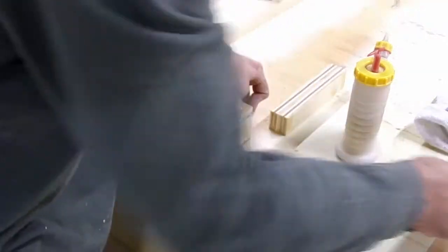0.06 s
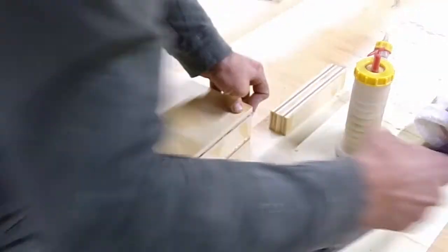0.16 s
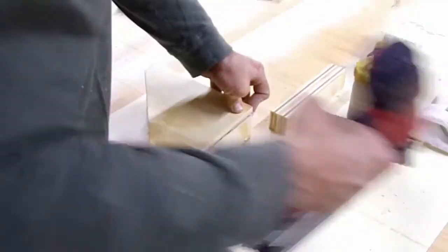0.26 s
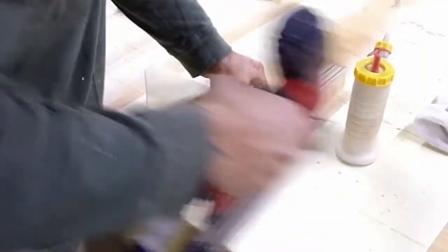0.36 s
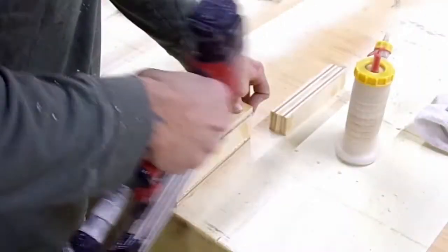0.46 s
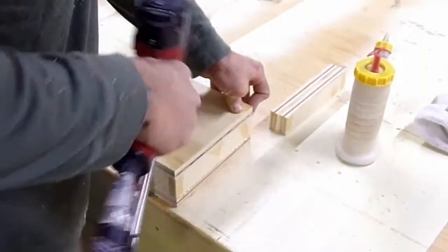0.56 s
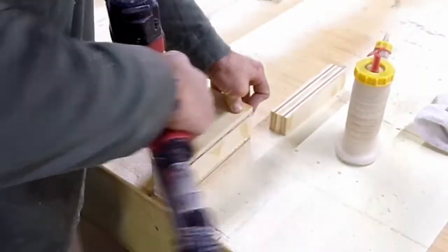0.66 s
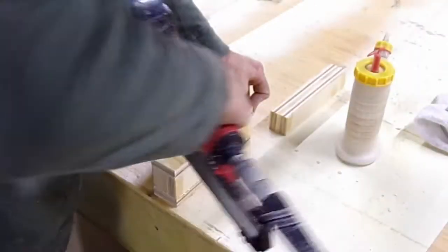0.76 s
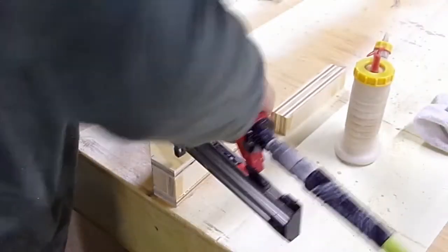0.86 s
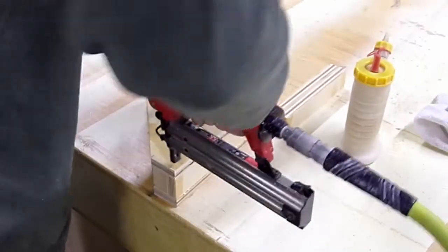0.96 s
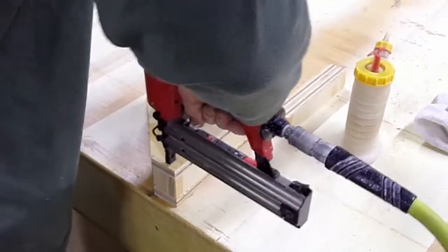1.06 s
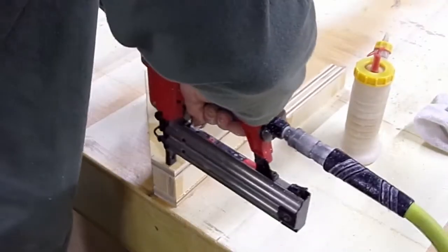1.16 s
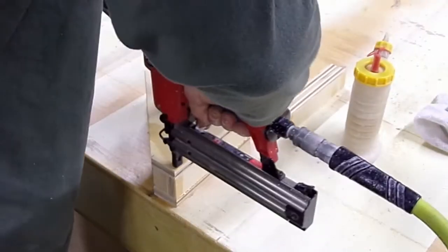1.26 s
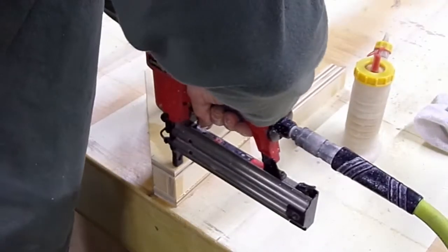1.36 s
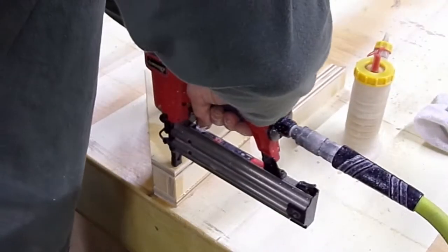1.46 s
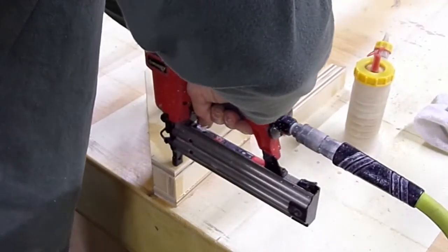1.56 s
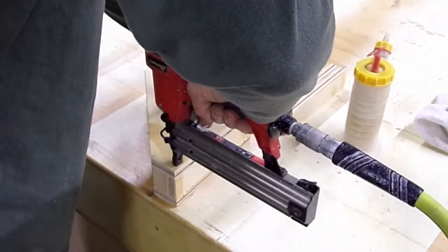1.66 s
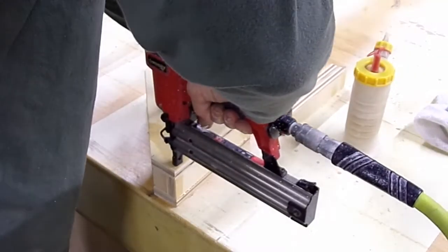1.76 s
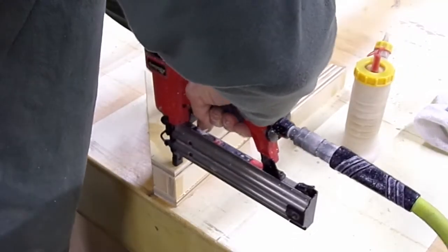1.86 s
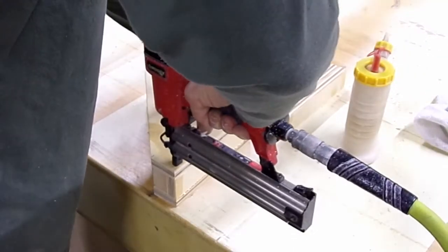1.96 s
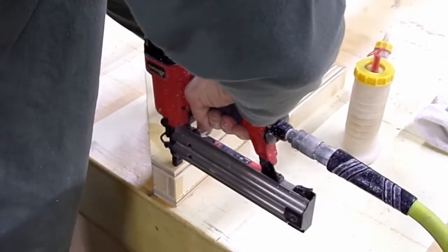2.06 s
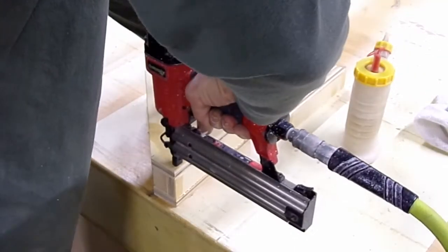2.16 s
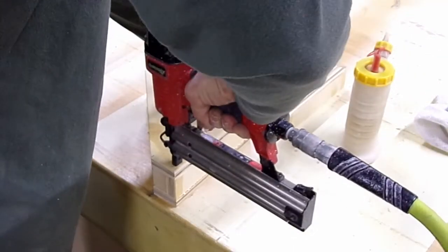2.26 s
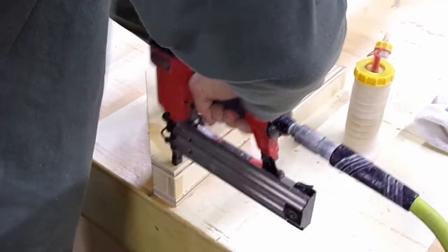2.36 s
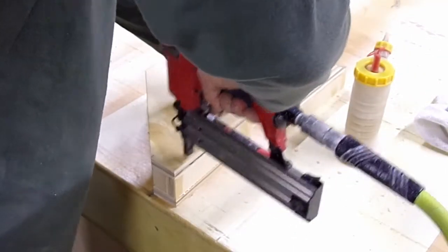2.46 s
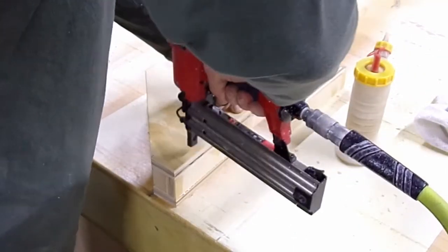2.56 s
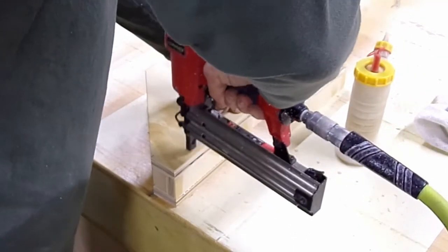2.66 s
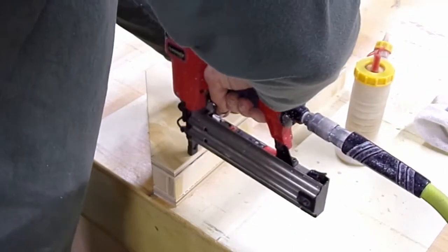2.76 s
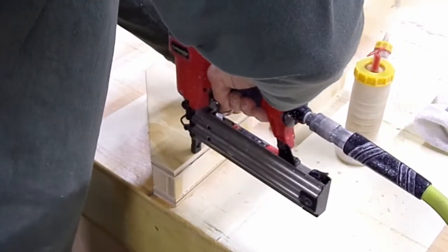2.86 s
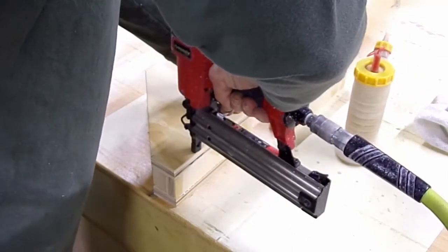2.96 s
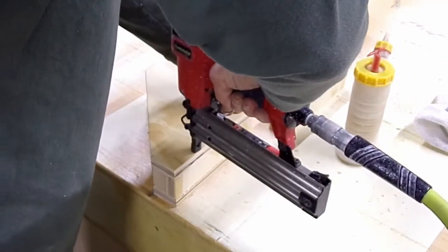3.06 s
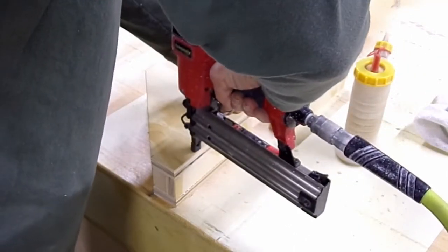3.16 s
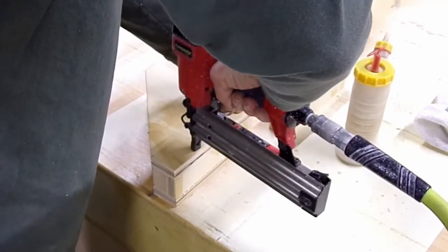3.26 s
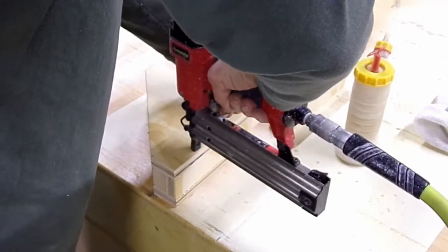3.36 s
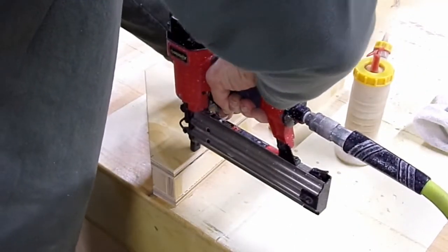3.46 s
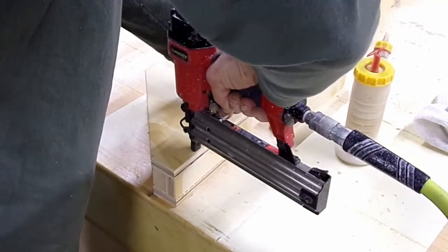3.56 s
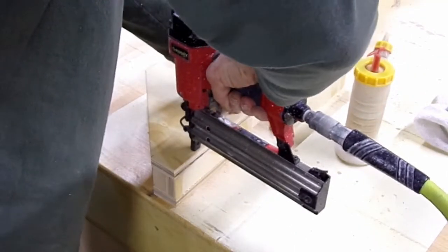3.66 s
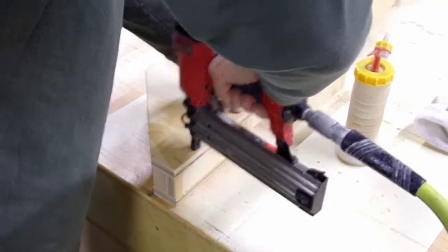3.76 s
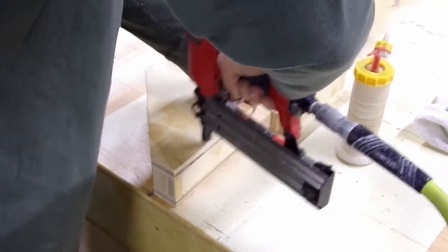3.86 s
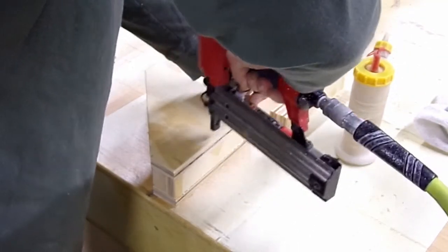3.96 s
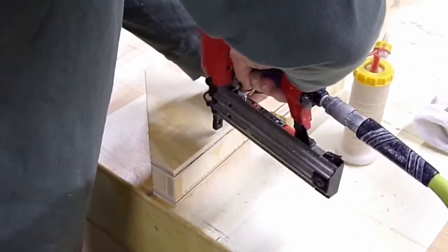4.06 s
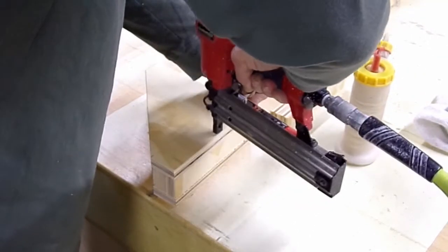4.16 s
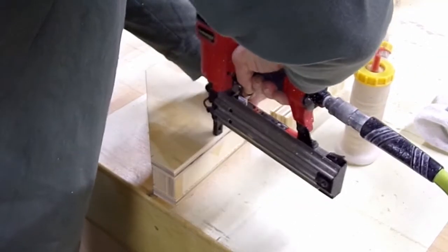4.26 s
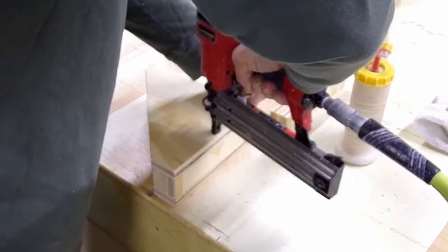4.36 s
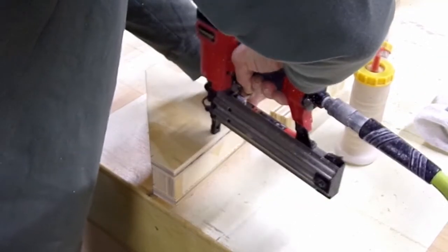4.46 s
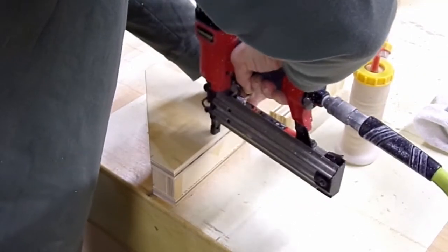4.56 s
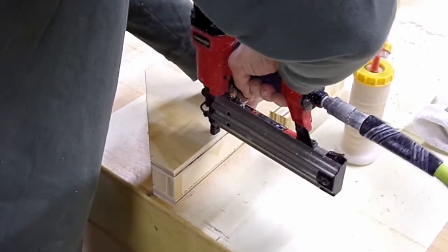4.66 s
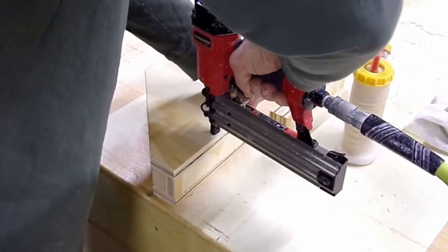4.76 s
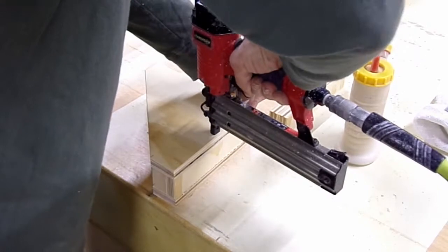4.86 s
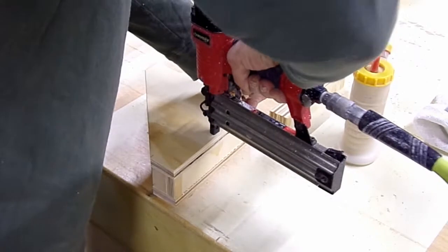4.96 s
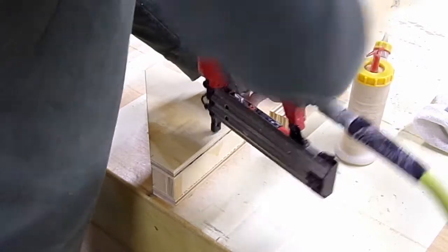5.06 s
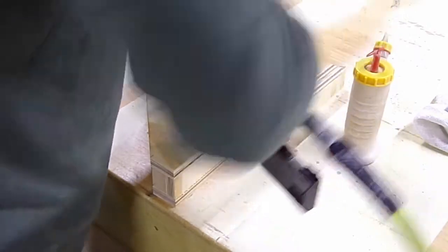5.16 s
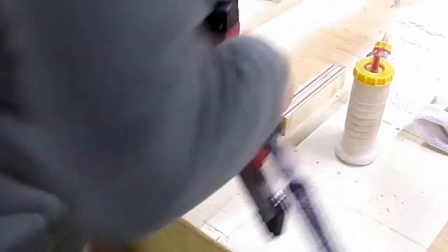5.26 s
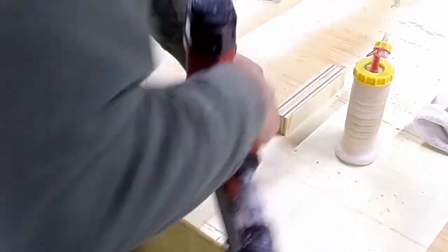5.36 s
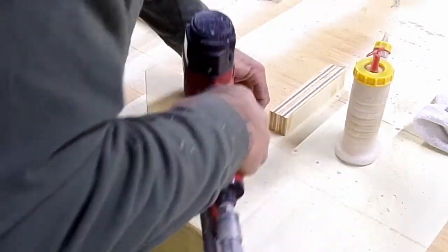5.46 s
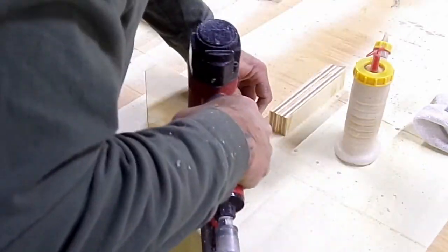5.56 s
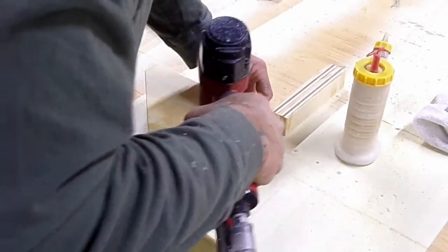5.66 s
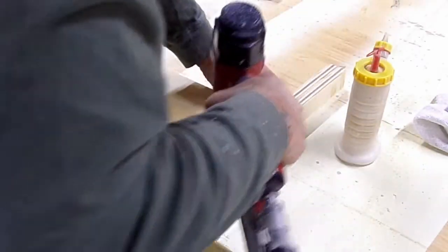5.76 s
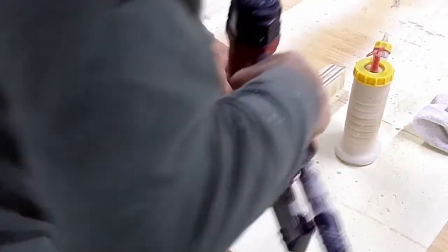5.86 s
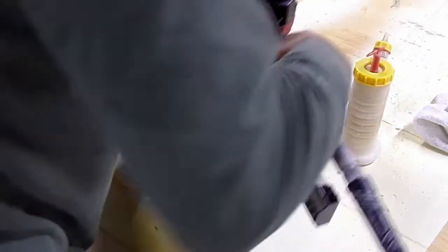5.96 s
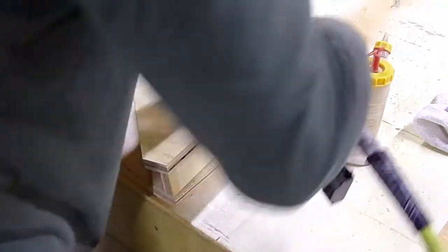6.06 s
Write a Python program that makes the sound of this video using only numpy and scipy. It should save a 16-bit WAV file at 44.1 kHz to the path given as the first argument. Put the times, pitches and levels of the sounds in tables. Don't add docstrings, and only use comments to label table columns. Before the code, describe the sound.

Over a low workshop hum, a pneumatic nailer ticks against plywood and fires three violent, distorted shots with air bursts, then a board knocks down.

```python
import sys
import numpy as np
from scipy import signal
from scipy.fft import rfft, irfft, next_fast_len
from scipy.io import wavfile
from scipy.ndimage import uniform_filter1d

SR = 44100
rng = np.random.default_rng(int(sys.argv[2]) if len(sys.argv) > 2 else 0)


def invert_db(x):
    u = np.asarray(x, float) / 20
    return 10 ** u


def file_out(sig):
    cols = np.atleast_2d(sig).T
    lim = np.clip(cols, -1, 1)
    pcm = np.round(lim * 32767).astype(np.int16)
    wavfile.write(sys.argv[1], SR, pcm)


N = 269892


def evened(x):
    return x / np.sqrt(np.mean(x ** 2) + 1e-20)


def read(points, hz):
    f, value = np.transpose(points)
    return np.interp(np.log(hz + 1), np.log(f + 1), value)


def add(mix, start_s, sound):
    part = mix[round(start_s * SR):][:len(sound)]
    part += sound[:len(part)]


def click(colour):
    hz = abs(np.fft.fftfreq(4096, 1 / SR))
    log_gain = np.log(invert_db(read(colour, hz)))
    minimum_phase = np.exp(np.conj(signal.hilbert(log_gain)))
    pulse = np.fft.ifft(minimum_phase).real[:2048]
    return pulse / abs(pulse).max()


def grit(length_s):
    x = rng.standard_normal(4096) * np.exp(-np.arange(4096) / SR / length_s)
    return x / np.linalg.norm(x)


def hiss(colour, pipes, size):
    hz = np.fft.rfftfreq(size, 1 / SR)
    gain = evened(invert_db(read(colour, hz)))
    for centre, width, db in pipes:
        strength = invert_db(db) * np.sqrt(SR / width / np.pi)
        gain = gain + strength / (1 + ((hz - centre) / width * 2) ** 2)
    return evened(irfft(rfft(rng.standard_normal(size)) * gain, size))


def ring(modes, sag=0., scatter=.015):
    t = np.arange(SR // 4) / SR
    bent_t = t + sag * 0.021 * (1 - np.exp(-t / 0.03))
    x = np.zeros(len(t))
    for hz, db, t60 in modes:
        detune, lift_db = rng.uniform(-1, 1, 2) * [scatter, 2]
        x += invert_db(db + lift_db - 60 * t / t60) * np.sin(2 * np.pi * hz * (1 + detune) * bent_t)
    x *= 1 - np.exp(-t * modes[0][0])
    return x / abs(x).max()


def push():
    u = np.arange(SR // 8) / SR / 0.0035
    return u * np.exp(1 - u)


# frequency in Hz, delay in ms.
PLATE_DELAY = [(100, 9), (400, 7), (1000, 4.2), (1800, 2.2), (3000, 1.1), (7000, .1), (15000, 0)]


def through_plate(x, reach=0.93):
    hz = np.fft.rfftfreq(4096, 1 / SR)
    delay_ms = reach * read(PLATE_DELAY, hz) + .5
    phase = 2 * np.pi * np.cumsum(delay_ms) / 1000 * SR / 4096
    spread = irfft(rfft(x, 4096) * np.exp(-1j * phase))[:2048]
    fade_in = np.clip(np.arange(2048) / 15, 0, 1)
    fade_out = signal.windows.tukey(4096, .5)[2048:]
    return spread * fade_out * fade_in


# frequency in Hz, level in dB per Hz.
AIR_COLOUR = [(25, -37.5), (80, -36.5), (150, -10), (330, -11), (390, -21), (520, -20), (620, -14.5),
              (880, -22), (1100, -22), (3200, -23), (5000, -33.5), (7000, -41), (10000, -53.5),
              (15600, -47.5)]


def room_air():
    frames, hz = N // 256 + 5, np.fft.rfftfreq(1024, 1 / SR)
    real, imag, patches = rng.standard_normal((frames, 513, 3)).T
    patches = uniform_filter1d(patches, size=8, axis=0)
    patches = evened(uniform_filter1d(patches, size=14, axis=1))
    z = (real + 1j * imag) * invert_db(read(AIR_COLOUR, hz)[:, None] + 0.4 * patches)
    return invert_db(-48.5) * evened(signal.istft(z, nperseg=1024, noverlap=768)[1][:N])


# frequency in Hz, rms level in dB, waver in Hz.
HUM_TONES = [(120.9, -45.5, 1.8), (245, -63, 4.9), (293, -58, 4), (361, -58.5, 3.7), (427, -60.5, 4.6),
             (608, -58.5, 30), (768, -63.5, 3), (854, -58.5, 3.8), (950, -67.5, 8.4), (1043, -63, 4),
             (1520, -73.5, 3)]


def hum():
    t = np.arange(N) / SR
    out = np.zeros(N)
    for hz, db, waver_hz in HUM_TONES:
        wander = np.cumsum(rng.standard_normal(N)) * np.sqrt(2 * np.pi * waver_hz / SR)
        out += invert_db(db) * np.sqrt(2) * np.sin(2 * np.pi * hz * t + wander)
    return out


# frequency in Hz, t60 in s.
SHOP_DECAY = [(100, .25), (400, .22), (900, 0.26), (1800, 0.35), (3500, .42), (7000, .38), (10000, 0.33),
              (15000, .25)]
# delay in s, level in dB.
EARLY_ECHOES = [(.0075, -18), (.012, -17), (.017, -22), (.026, -22)]


def shop():
    taps = np.zeros(SR)
    at = np.arange(150, SR - 20, 20)
    signs = rng.choice([-1., 1.], len(at))
    taps[at + rng.integers(0, 20, len(at))] = signs * np.clip(at / SR / .012, 0, 1)
    hz, t, z = signal.stft(taps, SR, nperseg=256)
    hz = hz[:, None]
    decay_db = -60 * t / read(SHOP_DECAY, hz)
    dulling_db = -6 / (1 + (9000 / (hz + 1)) ** 6)
    tail = signal.istft(z * invert_db(decay_db + dulling_db), SR, nperseg=256)[1]
    tail = tail / np.linalg.norm(tail)
    for k, (delay_s, db) in enumerate(EARLY_ECHOES):
        add(tail, delay_s, np.array([(-1) ** k * invert_db(db)]))
    return tail


# frequency in Hz, level in dB.
BOOMY_CLICK = [(100, -46), (300, 26.5), (800, -26), (1500, -14.5), (2600, 5), (4500, 1), (7500, -37),
               (10000, -55), (15000, -86)]
WOODY_CLICK = [(100, -32), (300, -14.5), (900, 9), (1600, -4.5), (2700, -1), (4500, -19.5), (7500, -41),
               (10000, -69), (15000, -81)]
# frequency in Hz, level in dB, t60 in s.
BOARD_LOW_MODES = [(126, 7.5, 0.079), (201, 15, 0.15), (235.7, -3, 0.31), (313.4, -1, 0.19),
                   (487, -4, 0.29)]
BOARD_HIGH_MODES = [(780, -3, .05), (880, 0, .04), (1080, -3, .05), (1420, -4, .04), (1600, -3, .04),
                    (2100, -8, .03)]


def knock(mix, start_s, click_db, woody, low_db, high_db):
    woody = np.clip(woody, 0, 1)
    colour = []
    for (hz, boomy_db), (_, woody_db) in zip(BOOMY_CLICK, WOODY_CLICK):
        colour.append((hz, (1 - woody) * boomy_db + woody * woody_db))
    add(mix, start_s - .0005, invert_db(click_db + 2.5) * through_plate(click(colour)))
    chatter = np.convolve(grit(0.022), click(colour))
    add(mix, start_s + .002, invert_db(click_db) * chatter)
    add(mix, start_s + 0.0027, invert_db(low_db) * ring(BOARD_LOW_MODES))
    add(mix, start_s + 0.00213, invert_db(high_db) * ring(BOARD_HIGH_MODES))


# start in seconds, click in dB, woodiness 0-1, low ring in dB, high ring in dB.
BOARD_KNOCKS = [
    (5.8397, 2, 0.48, -11.5, -8.5),
    (5.847, -22, 0.2, -11.5, -33),
    (5.8497, -7.5, 0.5, -42, -36),
    (5.8513, -7, 1, -44, -39),
    (5.918, -33, 0.1, -45, -39),
    (5.9780, -9.5, 1, -47, -17),
    (5.9836, -43, 1, -25, -20),
    (5.996, -35, 0.9, -27.5, -29),
]


def board_set_down(mix):
    for row in BOARD_KNOCKS:
        knock(mix, *row)


def scrape(mix, start_s, db, centre_hz, octaves, length_s):
    skirt = [(-3, -30), (-1, -5), (0, 0), (1, -12), (3, -45)]
    colour = click([(centre_hz * 2 ** (k * octaves), skirt_db) for k, skirt_db in skirt])
    peak = np.sqrt(1 + length_s * SR / 8) / np.linalg.norm(colour)
    add(mix, start_s, invert_db(db + 4.0) * peak * np.convolve(grit(length_s), colour))


def tick(mix, start_s, db, centre_hz):
    scrape(mix, start_s, db, centre_hz, octaves=.8, length_s=.003)


# start in seconds, level in dB, centre in Hz.
TIP_TICKS = [(.001, -46, 7000), (.32, -57, 8700), (1.443, -37.5, 6000), (1.463, -59, 7690),
             (1.781, -60.5, 9000), (1.872, -42.5, 5520), (2.706, -41.5, 4000), (2.716, -40.5, 5930),
             (2.763, -49.5, 7000), (3.228, -50, 6060), (3.252, -63, 9000), (3.374, -48.5, 6490),
             (4.422, -61.5, 9000), (4.431, -39, 6000), (4.605, -36.5, 6500), (4.606, -47, 14500),
             (4.637, -36.5, 3800), (4.637, -52, 14500)]
# start in seconds, level in dB, centre in Hz, length in s.
TOOL_RUBS = [(.001, -35.5, 2610, 0.033), (.002, -57, 5000, 0.19), (1.043, -50.5, 5070, 0.04),
             (1.464, -37, 1660, 0.018), (1.467, -41.5, 4070, .018), (1.515, -43, 2200, 0.0044),
             (1.874, -35.5, 2580, .006), (2.712, -54, 14000, .02), (2.715, -37, 685, 0.033),
             (2.719, -39.5, 2800, .04), (2.744, -40, 3500, .012), (3.375, -39.5, 2580, .01),
             (4.433, -36.5, 2550, 0.0079), (4.608, -24, 2600, 0.0083), (4.612, -37.5, 800, 0.017),
             (4.626, -35.5, 2780, .01)]


def ticks_and_rubs(mix):
    for row in TIP_TICKS:
        tick(mix, *row)
    for start_s, db, hz, length_s in TOOL_RUBS:
        scrape(mix, start_s, db, hz, octaves=0.72, length_s=length_s)


# frequency in Hz, level in dB, t60 in s.
NOSE_MODES = [(8520, 6, 0.11), (2156, -4.5, 0.057), (3950, -8.5, 0.057), (8400, 4, .08),
              (14000, -14, 0.036)]
# start in seconds, level in dB.
NOSE_PINGS = [
    (1.462, -47),
    (1.87, -54.5),
    (2.712, -57),
    (2.746, -48),
    (4.423, -56),
    (4.431, -51),
]


def nose_pings(mix):
    for start_s, db in NOSE_PINGS:
        add(mix, start_s, invert_db(db) * ring(NOSE_MODES, scatter=.002))


# frequency in Hz, level in dB, t60 in s.
BENCH_MODES = [(222, 2, .075), (200, -9, .09), (330, -10, .07), (110, -14, .06)]
# frequency in Hz, level in dB, t60 in s.
BOX_MODES = [(125, -14, .08), (195, -8, .08), (290, -4, .06), (372, -3, .07), (432, -5, .06),
             (624, -9, .05), (800, -7, .05), (1060, 0, .04), (1335, -1, .04), (1550, -5, .05),
             (1730, -4, .06), (2412, -7, .06), (2650, -5, .06), (2930, -6, .05)]
# start in seconds, level in dB.
BOX_THUDS = [
    (.001, -50),
    (2.72, -54.5),
    (3.23, -46),
    (3.39, -41),
    (4.608, -36.5),
    (4.639, -36),
]


def box_thuds(mix):
    for start_s, db in BOX_THUDS:
        body = ring(BENCH_MODES[1:] + BOX_MODES[:6])
        add(mix, start_s, invert_db(db + 8.5) * signal.fftconvolve(grit(0.0026), body))
        add(mix, start_s, invert_db(db - 9) * push())


# frequency in Hz, level in dB per Hz.
VALVE_COLOUR = [(180, -39), (300, -9), (2000, -19.5), (4070, 0.5), (4650, -13), (6360, -11.5),
                (7750, -12.5), (8840, -9.5), (10400, -21.5), (15500, -12)]
# frequency in Hz, width in Hz, level in dB.
VALVE_WHISTLES = [(4000, 300, -12), (8700, 500, -12.5)]


def valve_opens(mix, hit, lead_s):
    t = np.arange(8192) / SR
    opening = np.clip(t / .004, 0, 1) ** 2 * invert_db(-150 * t) * (t < lead_s + .004)
    add(mix, hit - lead_s - .001, invert_db(-13) * opening * hiss(VALVE_COLOUR, VALVE_WHISTLES, len(t)))


def trigger_let_go(mix, vent):
    t = np.arange(8192) / SR
    puff = np.clip(t / .001, 0, 1) * invert_db(-600 * t) * (t < .013)
    whistles = [(9500, 1200, 3), (14000, 1800, 8.8)]  # Hz, width Hz, dB
    add(mix, vent - .012, invert_db(-31.5) * puff * hiss(VALVE_COLOUR, whistles, len(t)))


# frequency in Hz, level in dB per Hz.
EXHAUST_COLOUR = [(59, -49.5), (100, -14), (355, -8), (1230, -12.5), (1800, -19), (2130, -3), (2930, -3.5),
                  (4460, -1), (7100, -2), (8060, -6), (8770, -13), (15500, -9.5)]
# frequency in Hz, width in Hz, level in dB.
EXHAUST_WHISTLES = [(2500, 1900, -11), (7000, 1000, -11), (8760, 780, -5.5), (12500, 2100, -8.5)]


def exhaust_vents(mix, vent, home_after_s, vent_db):
    add(mix, vent, invert_db(-22) * push())
    t = np.arange(8192) / SR
    past_home = t - .002 - home_after_s
    flow_db = -24 * np.clip(1 - t / 0.0049, 0, 1) ** 2
    flow_db += -5.5 * np.clip((t - .02) / 0.0025, 0, 1)
    flow_db += -9.5 * np.clip(past_home / .008, 0, 1)
    flow_db += -620 * np.clip(past_home - .008, 0, 1)
    air = hiss(EXHAUST_COLOUR, EXHAUST_WHISTLES, len(t))
    add(mix, vent - .002, invert_db(vent_db + flow_db) * air * (t < .092))


# frequency in Hz, level in dB.
BUMP_COLOUR = [(60, -34), (350, -22), (650, -26), (900, -5), (1250, 0), (1900, -6), (2800, -15),
               (5500, -15), (8000, -26), (15000, -40)]
# frequency in Hz, level in dB, t60 in s.
CAP_MODES = [(1240, -0.5, 0.0095), (2000, 2.5, 0.012), (317, -10.5, 0.012)]
# Hz, width in Hz, dB.
SEEPING_AIR = [
    [(2000, -60), (15500, -60)],
    [(9700, 150, 0), (13000, 250, -2)],
]


def piston_home(mix, home):
    add(mix, home - .0002, invert_db(8.5) * through_plate(click(BUMP_COLOUR), reach=0.59))
    add(mix, home + 0.003, invert_db(-4) * ring(CAP_MODES))
    size = 32768
    add(mix, home, invert_db(-63 - np.linspace(0, 26, size)) * hiss(*SEEPING_AIR, size))


# frequency in Hz, level in dB per Hz.
BLOW_COLOUR = [(60, -19), (300, -2), (800, -5), (1300, -0.5), (2600, 0), (3600, -2.5), (5200, -6),
               (7900, -14.5), (9000, -22.5), (11500, -30), (15500, -28)]


def driver_blow(mix, hit, blow_db):
    t = np.arange(8192) / SR
    slam = invert_db(4 - 900 * t)
    recoil = invert_db(-5 - 350 * t)
    rattle = np.clip(t / 0.0007, 0, 1) * (slam + recoil)
    add(mix, hit, invert_db(blow_db) * rattle * hiss(BLOW_COLOUR, [], len(t)))
    crack = invert_db(-1500 * t) * hiss(EXHAUST_COLOUR, EXHAUST_WHISTLES, len(t))
    add(mix, hit + .001, invert_db(blow_db + 2.5) * crack)
    add(mix, hit, invert_db(blow_db - 6.5) * ring(BOX_MODES, sag=.05))
    add(mix, hit, invert_db(-15.5) * push())
    t = np.arange(SR // 4) / SR
    slow_start = 1 - np.exp(-(t / .04) ** 2)
    add(mix, hit, invert_db(blow_db + 12.5) * ring(BENCH_MODES, sag=.45) * slow_start)


# driver hit in seconds, trigger earlier by s, valve earlier by s,
# blow in dB, exhaust in dB.
NAILER_SHOTS = [
    (2.2088, .031, .0143, 0, -3.5),
    (3.6195, .027, .0135, 0, -3.5),
    (4.871, .025, 0.014, 0, -4),
]


def nailer(mix):
    home_after_s = .0322
    for hit, trigger_lead_s, valve_lead_s, blow_db, vent_db in NAILER_SHOTS:
        vent = hit + .1174
        tick(mix, hit - trigger_lead_s, -48, 7500)
        valve_opens(mix, hit, valve_lead_s)
        driver_blow(mix, hit, blow_db)
        trigger_let_go(mix, vent)
        exhaust_vents(mix, vent, home_after_s, vent_db)
        piston_home(mix, vent + home_after_s)


def scene():
    tool, board = np.zeros((2, N))
    board_set_down(board)
    ticks_and_rubs(tool)
    nose_pings(tool)
    box_thuds(tool)
    nailer(tool)
    send = invert_db(-11) * tool + invert_db(-13.0) * board
    wet = signal.fftconvolve(send, shop())[:N]
    return (tool + board + wet + room_air() + hum())[None]


def band_limit(x):
    return signal.sosfilt(signal.butter(12, 15650, fs=SR, output="sos"), x)


# frequency in Hz, width in Hz.
PORT_NOTCHES = [(3680, 89), (4380, 130), (8020, 140), (11700, 650)]


def record(dry):
    size = next_fast_len(N + 4096)
    hz = np.fft.rfftfreq(size, 1 / SR)
    gain = 1j * hz / (60 + 1j * hz)
    for centre, width in PORT_NOTCHES:
        offset = 1j * (hz - centre)
        gain *= offset / (width + offset)
    gain *= np.clip((15760 - hz) / 120, 0, 1)
    heard = irfft(rfft(dry, size) * gain, size)[:, :N]
    overloaded = np.clip(heard, -1, 1)
    return band_limit(overloaded)


dry = scene()
out = record(dry)
file_out(out)
```